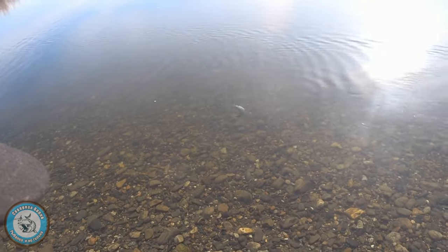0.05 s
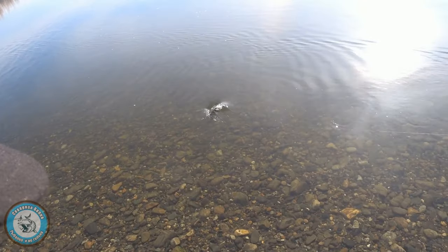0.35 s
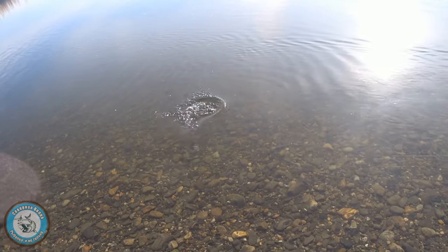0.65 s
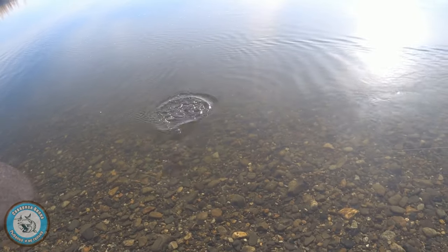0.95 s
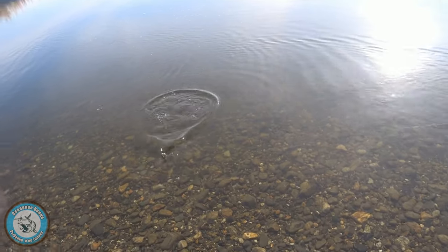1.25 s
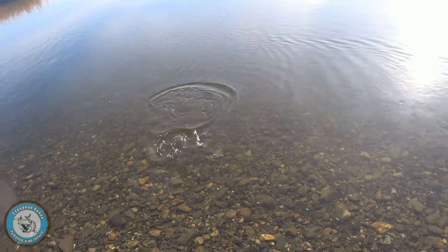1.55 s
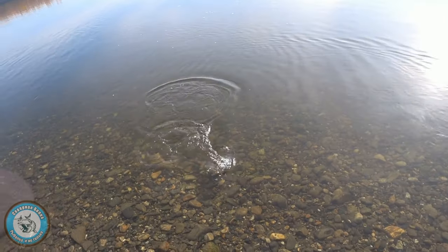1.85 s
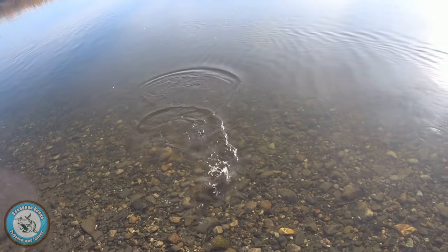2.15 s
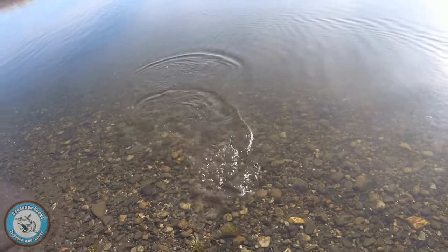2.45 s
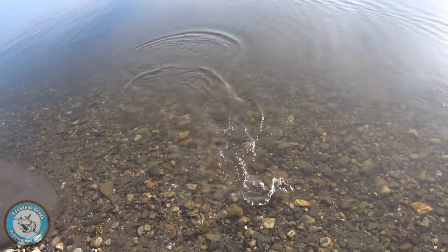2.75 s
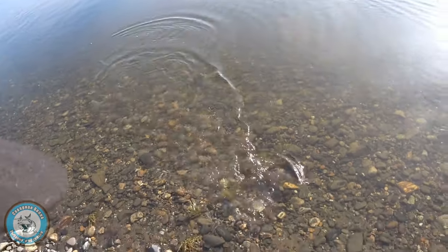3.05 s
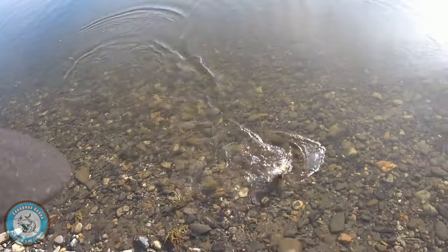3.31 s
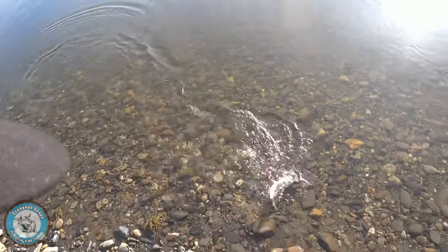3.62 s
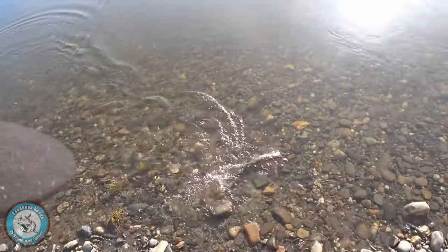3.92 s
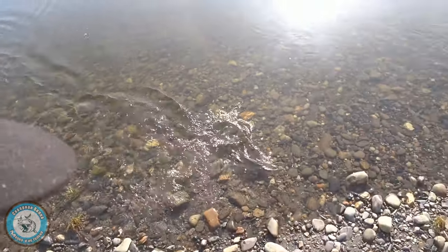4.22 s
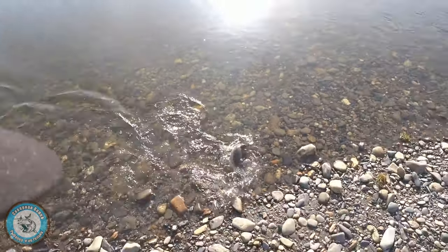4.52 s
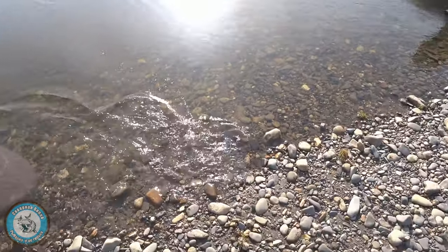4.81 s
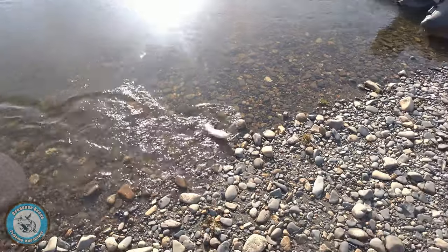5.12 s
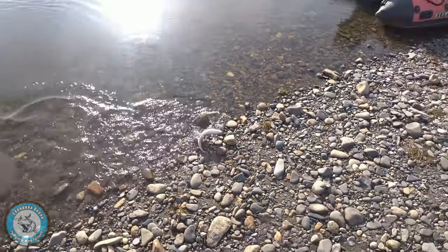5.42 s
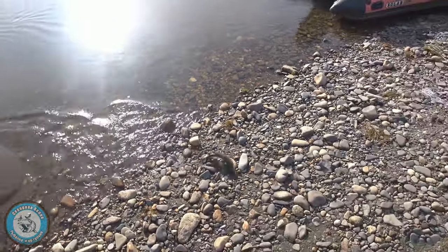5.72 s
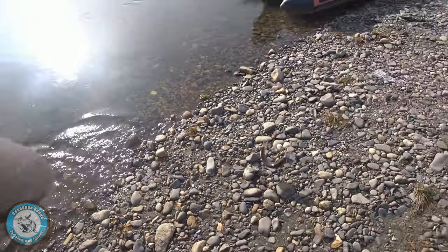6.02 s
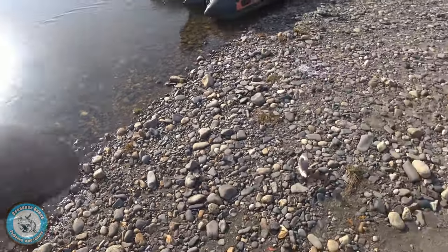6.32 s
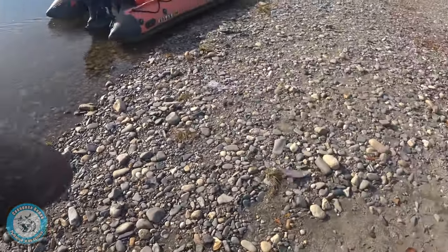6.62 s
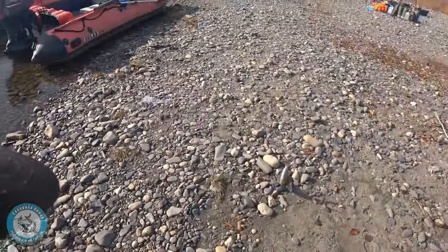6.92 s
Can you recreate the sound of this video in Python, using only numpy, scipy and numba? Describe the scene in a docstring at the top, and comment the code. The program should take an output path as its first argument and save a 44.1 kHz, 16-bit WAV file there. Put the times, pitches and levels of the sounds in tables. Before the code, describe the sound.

Sharp splashes and bubbly sloshing from a struggling fish grow nearer, giving way to clicking stones, crunching gravel and wind thumps.

```python
"""Stony river shallows, heard from the pebble bank through a body-worn camera's microphone.
A hooked fish thrashes nearer and nearer: each tail slap throws spray and traps air that rings as
rising bubbles. It is hauled onto the bank, where stones click and gravel crunches close by.
Wind buffets the microphone towards the end; behind it all are a faint river and a fainter insect."""
import sys
import numpy as np
from scipy import signal
from scipy.fft import rfft, irfft
from scipy.io import wavfile
from scipy.ndimage import uniform_filter1d
from numba import njit

SR = 44100
rng = np.random.default_rng(int(sys.argv[2]) if len(sys.argv) > 2 else 0)


def digitize_waveform(pressure):
    """Quantize a signal to 16-bit integers and store it at the path in sys.argv[1].

    Rows of a 2-D input are taken as channels; values are limited to [-1, 1].
    """
    field = np.atleast_2d(pressure).T
    bounded = np.clip(field, -1, 1)
    quanta = np.round(bounded * 32767).astype(np.int16)
    wavfile.write(sys.argv[1], SR, quanta)


N = 306936
T = np.arange(N) / SR
FREQS = np.fft.rfftfreq(N, 1 / SR) + 1e-3
TOP_HZ = 11100  # the camera's treble limit


# Tail and body strike the shallows, nearing the bank: (time [s], spray level [dB], slosh level [dB])
SLAPS = [(0.304, -27, -42), (0.369, -32.5, -40.5), (.436, -24, -33), (.452, -34, -40), (0.485, -33, -40),
         (0.685, -40, -54), (0.74, -41, -65), (1.384, -39.5, -66), (1.482, -30.5, -43), (1.559, -27, -41.5),
         (1.574, -40, -39.5), (1.609, -40, -40), (1.659, -34, -46), (1.714, -43, -45), (1.962, -30, -39),
         (2.108, -35, -45.5), (2.323, -28.5, -46), (2.374, -29, -40.5), (2.631, -27.5, -56),
         (2.694, -30.5, -46.5), (2.731, -30.5, -66), (2.888, -26.5, -57), (3.148, -28, -49),
         (3.219, -39, -65), (3.362, -18.5, -39), (3.389, -24.5, -65), (3.543, -28.5, -34.5),
         (3.586, -28.5, -46), (3.685, -17, -46), (3.758, -23.5, -38), (3.797, -19.5, -34),
         (3.813, -17.5, -39.5), (4.227, -24.5, -36.5), (4.242, -26, -39), (4.505, -25, -36),
         (4.611, -23, -36), (4.677, -17, -39), (4.731, -28, -59), (4.803, -24, -38), (4.972, -27, -41.5),
         (5.169, -47, -43)]
# Tone of a slap's spray, and of all sloshing water: (frequency [Hz], gain [dB])
SLAP_COLOUR = [(300, -2), (1200, -34), (2500, -8.5), (4200, 1.5), (6500, 2), (8500, -3.5), (11000, 1)]
SLOSH_COLOUR = [(120, -17), (320, -6), (600, -4.5), (1100, 4.5), (1800, -4), (2800, -5.5), (5000, -10)]

def slaps(attack_s=.0071, spray_t60=.053, slosh_t60=.086, plop_hz=1380, plop_t60=.0076):
    """The fish hits the surface: spray bursts, a pocket of air plops, displaced water sloshes."""
    times, spray_db, slosh_db = np.transpose(SLAPS).copy()
    plinks = grains(rate=1100, band_hz=(1800, 10000), cycles=36, scatter_db=3, width=.5)
    mist = undb(-7) * unit(noise(width=.12))
    spray = unit(mist + plinks) * undb(2 * walk(150))
    spray = colour(spray * bursts(times, undb(spray_db - 7), spray_t60, attack_s), SLAP_COLOUR)
    slosh = grains(rate=1400, band_hz=(280, 3500), cycles=15, scatter_db=2, width=.7)
    slosh = unit(colour(slosh, SLOSH_COLOUR)) * bursts(times, undb(slosh_db), slosh_t60, attack_s)
    hz = plop_hz * 2 ** (.324 * rng.standard_normal(len(times)))
    plops = rings(times + attack_s, hz, undb(slosh_db + 1), plop_t60, glide=14, onset=.66)
    return spray + slosh + plops


# Larger air pockets around the fish:
# (time [s], pitch [Hz], level [dB], ring t60 [s], glide [octaves/s])
BUBBLES = [(.304, 507, -49, 0.098, 34), (.318, 862, -49.5, 0.64, 30.5), (0.362, 1150, -31.5, .026, -5),
           (.376, 805, -45, 0.087, 1.5), (.39, 259, -38, 0.21, 4), (.405, 857, -59, .17, 33),
           (.4895, 712, -25.5, 0.023, 35), (0.504, 1000, -35, 0.041, 41), (0.516, 407.4, -37, 0.13, 16.5),
           (.58, 940, -43, 0.087, 18.5), (1.145, 940, -61, .23, 18), (1.32, 716, -50.5, 0.057, 0),
           (1.382, 1540, -37.5, 0.016, 32), (1.561, 1010, -42, 0.13, 4), (1.578, 487, -44, 0.04, 3),
           (1.607, 895, -36, 0.029, 41), (1.63, 850, -35, 0.04, -10), (1.635, 335, -49.5, 0.22, 7.5),
           (1.671, 1177, -49, 0.17, 0.5), (1.716, 780, -40.5, 0.037, 45), (1.733, 407, -48, 0.089, -1),
           (1.8, 512, -53, 0.2, 3.5), (1.815, 840, -37, 0.03, 27), (1.9595, 1096, -30.5, 0.027, 36),
           (2.047, 1740, -42.5, 0.022, -16), (2.108, 974, -48, 0.055, 1), (2.268, 620, -42.5, 0.037, 14),
           (2.28, 714, -47.5, 0.22, 37), (2.326, 1530, -27.5, 0.01, 33), (2.332, 2090, -30, 0.011, 29),
           (2.369, 975, -41.5, 0.078, 29.5), (2.735, 444, -33.5, 0.026, -18), (2.845, 1000, -43, 0.033, -2),
           (2.869, 1496, -42, 0.11, -3.5), (2.902, 1665, -39.5, 0.039, -8), (2.925, 872, -54.5, 0.14, 16),
           (3.0, 1270, -49.5, .09, 10), (3.01, 672, -54, 0.2, 6), (3.093, 1360, -42.5, 0.058, -1),
           (3.166, 1160, -41, 0.059, 23), (3.231, 690, -43, 0.082, 2), (3.249, 815, -45, .1, 35),
           (3.265, 1430, -39, 0.088, 4.5), (3.276, 970, -29.5, .008, 35), (3.333, 1120, -35, .02, 32),
           (3.366, 3460, -18.5, 0.0046, 37), (3.591, 250, -50, 0.3, 4), (3.704, 1130, -38.5, 0.063, 15),
           (3.758, 534, -43, 0.22, 7.5), (3.772, 855, -37, 0.086, 25.5), (3.796, 850, -17.5, 0.0071, 13),
           (3.797, 344, -45, 0.16, 4), (3.818, 2270, -25, 0.012, 3), (3.965, 818, -39.5, 0.069, 33),
           (4.227, 578, -40, .1, 26), (4.248, 1097, -22, 0.041, 31), (4.292, 678, -32, 0.14, 0.5),
           (4.37, 1030, -25, 0.016, -11), (4.39, 550, -42.5, 0.25, 15), (4.588, 784, -36.5, 0.041, -1),
           (4.615, 315, -40, 0.083, 5), (4.657, 791, -32, 0.029, 32), (4.681, 2410, -24.5, 0.0083, 35),
           (4.806, 770, -34.5, 0.079, -0.5), (4.969, 1367, -36.5, .031, 36),
           (5.026, 730, -40.5, 0.092, 40.5), (5.066, 1820, -39.5, 0.043, -3),
           (5.086, 3170, -36.5, 0.026, -6), (5.173, 1115, -30.5, 0.064, -5), (5.173, 2030, -32.5, 0.016, 3),
           (5.268, 1460, -27, 0.0043, 34), (5.368, 1350, -38.5, 0.019, 46), (5.376, 780, -34, .011, 41),
           (5.978, 474, -33.5, 0.019, -4)]

def bubbles(width=.58, shed_lag_s=.015, wobble_s=.00006):
    """Trapped air rings, mostly climbing in pitch as it nears the surface, and sheds a second bubble."""
    times, hz, level_db, t60, glide = np.transpose(BUBBLES).copy()
    place, size, lag = rng.standard_normal((len(times), 3)).T
    pan = width * place
    parents = rings(times, hz, undb(level_db), t60, glide, pan, onset=.48)
    shed_times = times + shed_lag_s * np.abs(lag)
    ratio = 1.4 * np.exp(.192 * size)  # smaller bubbles ring higher and shorter
    shed = rings(shed_times, ratio * hz, undb(level_db - 11), t60 / ratio, glide, -pan, onset=.48)
    heave = T + wobble_s * walk(160)  # heaving water makes the ringing wobble
    wobbling = np.array([np.interp(heave, T, channel) for channel in parents + shed])
    return wobbling * undb(1.5 * walk(200))


# Bouts of thrashing off the bank: (time [s], length [s], churn level [dB], spray level [dB])
THRASHES = [(.34, 0.25, -53, -57.5), (1.342, .14, -61, -58.5), (1.542, 0.056, -53.5, -62),
            (1.639, 0.059, -58.5, -54), (1.805, 0.58, -63.5, -64.5), (2.278, 0.12, -59.5, -59),
            (2.653, 0.29, -63.5, -59.5), (3.159, 0.24, -61, -58), (3.29, 0.4, -52, -49),
            (3.631, 0.084, -52, -48), (3.751, 0.068, -47, -43), (3.86, 0.44, -55.5, -53.5),
            (4.177, 0.41, -51.5, -51.5), (4.518, .23, -54, -49), (4.765, 0.043, -53.5, -51.5),
            (5.013, 0.19, -57.5, -55), (5.348, 0.066, -60, -51.5)]
# Tone of spray falling back on the river: (frequency [Hz], gain [dB])
SPRAY_COLOUR = [(500, -28), (1200, -29), (2500, -7.5), (4200, -0.5), (6500, 2), (8500, -4), (11000, -2.5)]

def wash(surge_db=1.64):
    """Stirred water sloshes with a swarm of bubbles; thrown drops plink back over a fine fizz."""
    times, lengths, churn_db, spray_db = np.transpose(THRASHES)
    # the water builds up, settles, then drains slowly away
    power = spells(times, lengths, attack_s=.031, t60=.3, linger_db=-10, linger_t60=2.2)
    churning, falling = np.sqrt(undb([churn_db, spray_db]) ** 2 @ power) * undb(surge_db * walk(35))
    swarm = grains(rate=700, band_hz=(700, 2800), cycles=28, scatter_db=3, width=.6, glide=10)
    strays = grains(rate=60, band_hz=(600, 2600), cycles=65, scatter_db=2, width=.5, glide=16)
    slosh = unit(colour(noise(width=.17) * undb(walk(70)), SLOSH_COLOUR))
    water = undb(-1) * swarm + undb(-9) * strays + undb(-5) * slosh
    fizz = grains(rate=4100, band_hz=(1400, 12400), cycles=6.2, scatter_db=.5, width=.68)
    fizz *= undb(2 * walk(60))
    drops = grains(rate=450, band_hz=(2600, 10500), cycles=38, scatter_db=5, width=.8, glide=14)
    drips = grains(rate=90, band_hz=(1600, 7000), cycles=32, scatter_db=4, width=.6, glide=20)
    spray = colour(undb(-3) * fizz + undb(-5) * drops, SPRAY_COLOUR) + undb(-10) * drips
    return churning * water + falling * spray


# Stone on stone, close by on the bank: (time [s], level [dB], ring pitch [Hz])
KNOCKS = [(5.2691, -31, 5920), (5.269, -28.5, 2660), (5.345, -21.5, 5530), (5.468, -21.5, 5400),
          (5.561, -32.5, 4180), (5.63, -29, 2870), (5.714, -35, 6740), (5.781, -28.5, 2980),
          (5.7994, -21.5, 7170), (5.834, -29, 8900), (5.883, -37, 4260), (5.952, -23, 6000),
          (6.052, -27.5, 8700), (6.105, -40, 6200), (6.32, -18, 4430), (6.359, -20, 7050),
          (6.325, -23, 5470), (6.375, -30, 2800), (6.412, -30, 4360), (6.6282, -26, 6440),
          (6.6401, -24.5, 8600), (6.686, -25.5, 6630), (6.696, -25.5, 6280), (6.749, -30.5, 6600),
          (6.775, -22, 6670), (6.787, -26.5, 4820), (6.813, -39, 7000), (6.84, -31, 6760),
          (6.936, -40, 6440)]
# Tone of the dry crack: (frequency [Hz], gain [dB])
STONE_COLOUR = [(300, -13), (1200, -10), (2800, -14), (4500, 2), (6800, 1.5), (9000, -4), (11000, -1)]

def pebbles(touch_lead_s=.0062, attack_s=.00076, crack_t60=.016, ring_t60=.0061):
    """A knock is a light touch, a dry crack and two brief rings of the gap between the stones."""
    times, level_db, hz = np.transpose(KNOCKS).copy()
    touch = bursts(times - touch_lead_s, undb(level_db - 17.5), crack_t60, attack_s)
    strike = bursts(times, undb(level_db - 5), crack_t60, attack_s)
    crack = colour(noise(width=.54) * (touch + strike), STONE_COLOUR)
    pan = .22 * rng.standard_normal(len(times))
    high = rings(times, hz, undb(level_db - 2), ring_t60, pan=pan)
    low = rings(times, .464 * hz, undb(level_db - 14), ring_t60, pan=pan)
    return crack + high + low


# Gravel shifting on the bank: (time [s], length [s], grind level [dB], grit level [dB])
CRUNCHES = [(5.443, 0.011, -59, -52), (5.536, .13, -62, -59.5), (5.614, 0.0057, -55.5, -45),
            (5.705, 0.017, -48.5, -44), (5.762, 0.034, -52, -49), (5.933, 0.067, -48, -44.5),
            (6.23, 0.11, -57, -47.5), (6.303, 0.022, -49.5, -46), (6.338, 0.049, -51.5, -47),
            (6.445, .1, -60.5, -49), (6.624, 0.24, -55, -53.5), (6.662, 0.012, -67, -38.5)]
# Tone of the sandy grit: (frequency [Hz], gain [dB])
GRIT_COLOUR = [(1000, 11), (2800, 4.5), (4500, -3.5), (6500, -1), (9000, -4), (11000, -1.5)]

def gravel():
    """Small stones grind and sand crackles between them."""
    times, lengths, grind_db, grit_db = np.transpose(CRUNCHES)
    # the gravel gives way, locks again, and a little trickles on
    power = spells(times, lengths, attack_s=.01, t60=.14, linger_db=-12, linger_t60=1)
    grinding, crackling = np.sqrt(undb([grind_db, grit_db]) ** 2 @ power)
    grind = grains(rate=1500, band_hz=(420, 3620), cycles=3.2, scatter_db=1, width=.29)
    grit = grains(rate=2500, band_hz=(3800, 11500), cycles=16, scatter_db=4, width=.9)
    return undb(-3) * (grinding * grind + crackling * unit(colour(grit, GRIT_COLOUR)))


# The breeze freshening at the microphone: (time [s], level [dB])
BREEZE = [(3.4, -58.5), (4.03, -57), (4.12, -45.5), (4.68, -60.5), (4.8, -46.5), (4.97, -55.5), (5.3, -52),
          (5.5, -40), (5.72, -49), (5.83, -38.5), (6.12, -42), (6.45, -33), (6.96, -28)]
# Gusts across the microphone: (time [s], length [s], level [dB])
GUSTS = [(6.186, 0.08, -33), (6.254, 0.17, -25.5), (6.438, 0.21, -23.5), (6.601, 0.098, -18.5),
         (6.71, 0.18, -25), (6.937, 0.054, -15)]
# Sharp buffets right on its port: (time [s], level [dB], pitch [Hz])
BUFFETS = [(4.842, -29.5, 46), (4.884, -29.5, 43.6), (5.533, -24.5, 121), (5.624, -24.5, 70),
           (5.877, -38, 110), (6.181, -34, 95), (6.297, -4, 226), (6.328, -7, 164), (6.376, -5.5, 127),
           (6.479, -9.5, 223), (6.545, -5, 172), (6.843, -4.5, 154), (6.875, -9, 323), (6.908, -0.5, 122),
           (6.948, -4.5, 326)]
# Tone of the breeze's rumble, the gusts' flutter and the buffets' puffs: (frequency [Hz], gain [dB])
RUMBLE_COLOUR = [(10, -8), (25, 5), (48, -2), (85, -6), (130, -16.5), (200, -24), (400, -31), (1000, -93)]
FLUTTER_COLOUR = [(30, -2), (80, -7), (122, 5), (170, 2.5), (230, -3), (350, -6), (500, -17), (750, -30.5),
                  (1100, -47.5), (2000, -24), (5000, -60)]
PUFF_COLOUR = [(100, 12.5), (300, -3), (550, 2.5), (850, -18.5), (1400, -35), (3000, -52)]

def wind(thump_cycles=3, puff_growth=1.79, choke_level=.27, band_hz=(8, 1050)):
    """Eddies rumble at the microphone port; strong gusts break into flutter and sharp buffets."""
    breeze = undb(np.interp(T, *np.transpose(BREEZE), left=-np.inf) - 3)
    rumble = breeze * unit(colour(noise(width=.23), RUMBLE_COLOUR))
    gusts = [undb(db) * held(start, length, attack_s=.023, t60=.11) for start, length, db in GUSTS]
    eddies = undb(2.5 * walk(90))
    flutter = np.max(gusts, axis=0) * unit(colour(noise(width=.26) * eddies, FLUTTER_COLOUR))
    # a buffet is a thump plus a puff of turbulence, which grows faster with the buffet's strength
    times, level_db, hz = np.transpose(BUFFETS).copy()
    thumps = rings(times, hz, undb(level_db + 1), thump_cycles / hz, onset=.21)
    puffing = bursts(times, undb(puff_growth * level_db + 2), t60=.019, attack_s=.0013)
    puffs = puffing * unit(colour(noise(width=.14), PUFF_COLOUR))
    # the narrow port chokes the strongest pushes and muffles it all
    choked = choke_level * np.tanh((rumble + flutter + thumps + puffs) / choke_level)
    return signal.sosfilt(signal.butter(5, band_hz, "bandpass", fs=SR, output="sos"), choked)


# Tone of the river in the background: (frequency [Hz], gain [dB])
RIVER_COLOUR = [(12, -48), (20, 9), (64, -8), (134, -13), (174, -11), (199, -14.5), (266, -13),
                (365, -13.5), (406, -12.5), (725, -16), (806, -13.5), (1110, -18.5), (11000, -34),
                (14300, -106), (22000, -120)]

def river(level_db=-60.5):
    """The current rushes faintly and evenly."""
    rush = noise(width=.2) * undb(1.3 * walk(30))
    return undb(level_db) * unit(colour(rush, RIVER_COLOUR))


def insect(level_db=-73.5, chirps_per_s=9.7, pitch_hz=9450):
    """A very faint, high chirp pulses on the bank."""
    wavering_hz = pitch_hz * (1 + .015 * walk(200))
    tone = np.sin(2 * np.pi * np.cumsum(wavering_hz) / SR)
    pulses = np.maximum(np.sin(2 * np.pi * chirps_per_s * T), 0)
    return undb(level_db) * tone * pulses * np.ones((2, 1))


def undb(db):
    """Decibels to gain."""
    return 10 ** (np.asarray(db) / 20)


def unit(x):
    """Scale to rms 1."""
    return x / np.sqrt(np.mean(x ** 2))


def response(points):
    """Gain at every frequency from (Hz, dB) points."""
    hz, db = np.transpose(points)
    return undb(np.interp(np.log(FREQS), np.log(hz), db))


def colour(x, points):
    """Filter by (Hz, dB) points, keeping the power of white noise below TOP_HZ."""
    gain = response(points)
    return irfft(rfft(x) * gain / np.sqrt(np.mean(gain[FREQS < TOP_HZ] ** 2)), N)


def walk(rate):
    """Random drift at rms 1: levels held 1 / rate seconds and smoothed twice."""
    hold = int(SR / rate)
    steps = np.repeat(rng.standard_normal(N // hold + 1), hold)
    return unit(uniform_filter1d(uniform_filter1d(steps, hold), hold)[:N])


def noise(width):
    """Stereo white noise; width is the gain of the side signal against the middle."""
    mid, side = rng.standard_normal((2, N))
    return mid + width * side * np.array([[1], [-1]])


def bursts(times, gains, t60, attack_s):
    """Sum of envelopes that rise quickly and die away."""
    out = np.zeros(N)
    for time, gain in zip(times, gains):
        start = int(time * SR)
        age = T[:min(N - start, SR // 2)]
        out[start:start + len(age)] += gain * (1 - np.exp(-age / attack_s)) * undb(-60 * age / t60)
    return out


def held(start, length, attack_s, t60):
    """An envelope that rises, holds until `length` is over, and dies away."""
    rise = np.sin(np.pi / 2 * np.clip((T - start) / attack_s, 0, 1))
    return rise * undb(-60 * np.clip((T - start - length) / t60, 0, 2))


def spells(times, lengths, attack_s, t60, linger_db, linger_t60):
    """Power envelope of each spell of movement: a quick release, then a faint, slow one."""
    quick = np.array([held(*spell, attack_s, t60) for spell in zip(times, lengths)])
    slow = np.array([held(*spell, attack_s, linger_t60) for spell in zip(times, lengths)])
    return np.maximum(quick, undb(linger_db) * slow) ** 2


@njit
def rings(times, hz, gains, t60, glide=0., pan=0., onset=1.):
    """Damped, panned sines that build up over `onset` cycles and glide in octaves per second."""
    out = np.zeros((2, N))
    each = np.ones(len(times))
    t60s, glides, pans = t60 * each, glide * each, pan * each
    for k in range(len(times)):
        start, pitch, gain, phase = int(times[k] * SR), hz[k], gains[k], 0.
        fade, climb = np.exp(-6.91 / (t60s[k] * SR)), 2 ** (glides[k] / SR)
        for i in range(max(start, 0), min(N, start + int(t60s[k] * SR))):
            phase += pitch / SR
            sample = gain * np.sin(2 * np.pi * phase) * (1 - np.exp(-phase / onset))
            out[0, i] += sample * (1 + pans[k])
            out[1, i] += sample * (1 - pans[k])
            pitch = min(pitch * climb, .4 * SR)
            gain *= fade
            if pitch > 1.8 * hz[k]:  # a bubble that has climbed this far surfaces and dies
                gain *= .996
    return out


def grains(rate, band_hz, cycles, scatter_db, width, glide=0.):
    """A steady shower of `rate` tiny rings a second, at rms 1: many faint, a few strong."""
    when, pitch, size, length, place, lift = rng.random((int(rate * (N / SR)), 6)).T.copy()
    low_hz, high_hz = band_hz
    hz = low_hz * (high_hz / low_hz) ** pitch
    gains = undb(-scatter_db * np.log(np.exp(-4) + size)) * np.sqrt(hz)
    t60 = cycles * (.5 + length) / hz
    pan = width * (2 * place - 1)
    return unit(rings(when * N / SR, hz, gains, t60, glide * (2 * lift - .5), pan, onset=.5))


def scene(fade_out_s=.012):
    """The fish in the water, the stones of the bank and the open air around them."""
    fish = bubbles() + wash() + slaps()
    bank = pebbles() + gravel()
    fade_out = np.minimum(T[::-1] / fade_out_s, 1)
    return fade_out * (fish + bank + wind() + river() + insect())


# Stereo widening behind the camera's microphone: (frequency [Hz], side gain [dB])
WIDENING = [(40, -12), (80, -10), (160, 0), (320, 5), (640, 9), (1300, 10.5), (2200, 6.5), (4500, 2.5),
            (6500, 0), (10500, -4.5)]

def record(dry, lead_s=1.15e-5):
    """The camera widens the stereo with a quarter-cycle-shifted copy of the middle, and cuts the top."""
    shift = np.exp(1j * (np.pi / 2 + 2 * np.pi * FREQS * lead_s))
    side = irfft(rfft(dry.mean(axis=0)) * response(WIDENING) * shift, N)
    wide = dry + side * np.array([[1], [-1]])
    return signal.sosfilt(signal.ellip(8, .2, 60, TOP_HZ, fs=SR, output="sos"), wide)


dry = scene()
out = record(dry)
digitize_waveform(out)
```